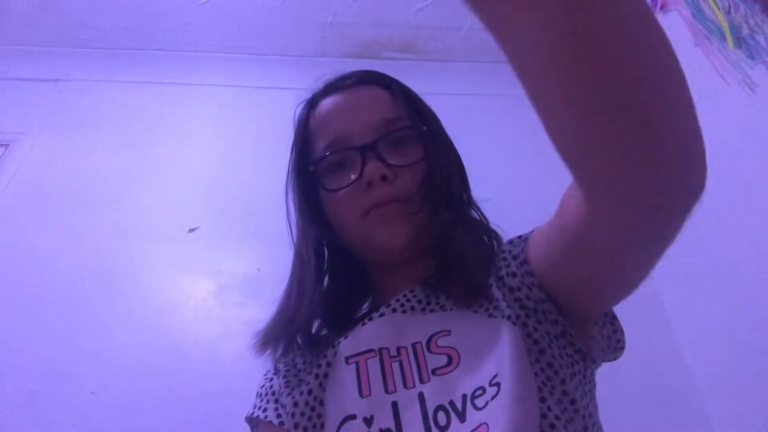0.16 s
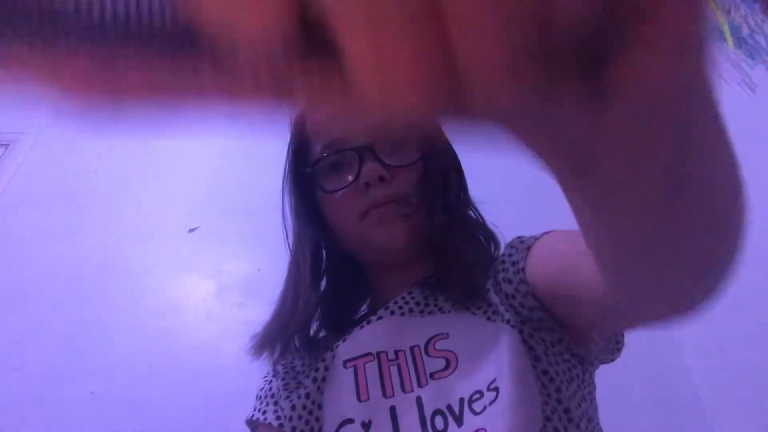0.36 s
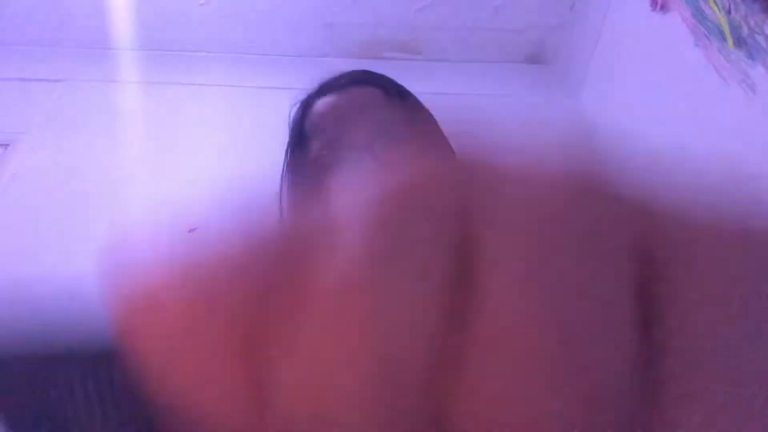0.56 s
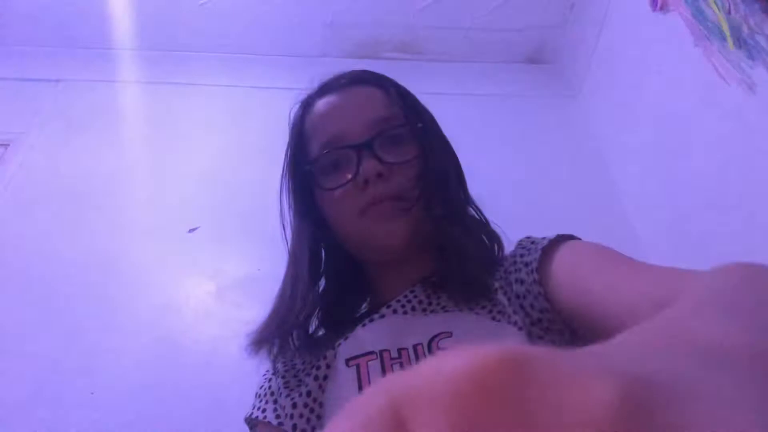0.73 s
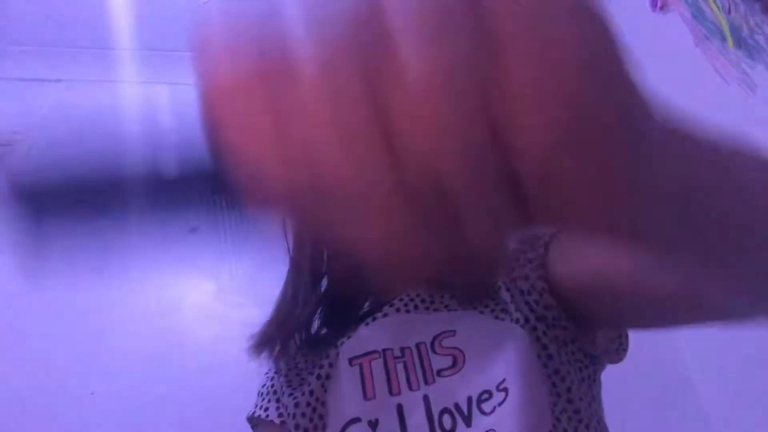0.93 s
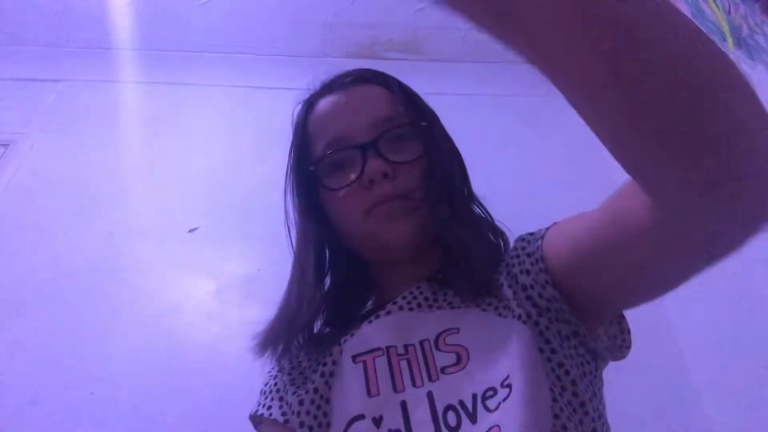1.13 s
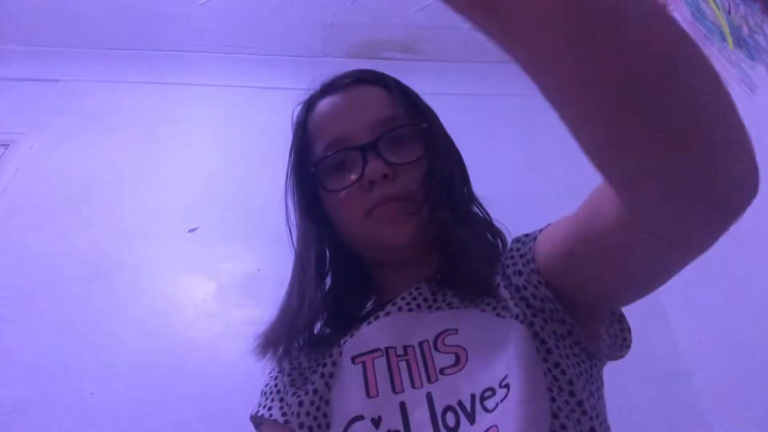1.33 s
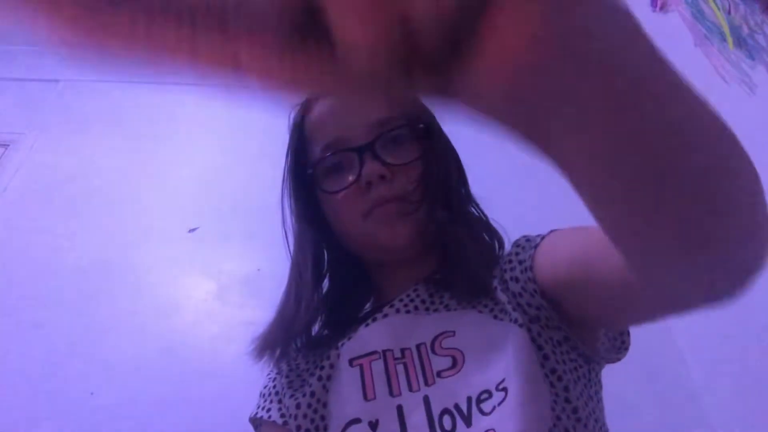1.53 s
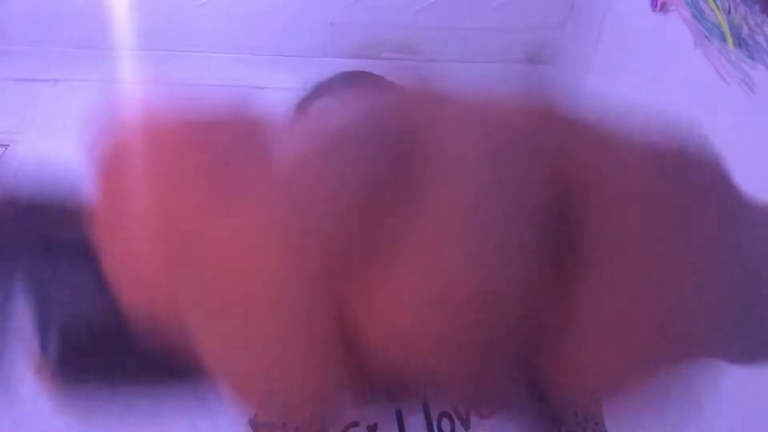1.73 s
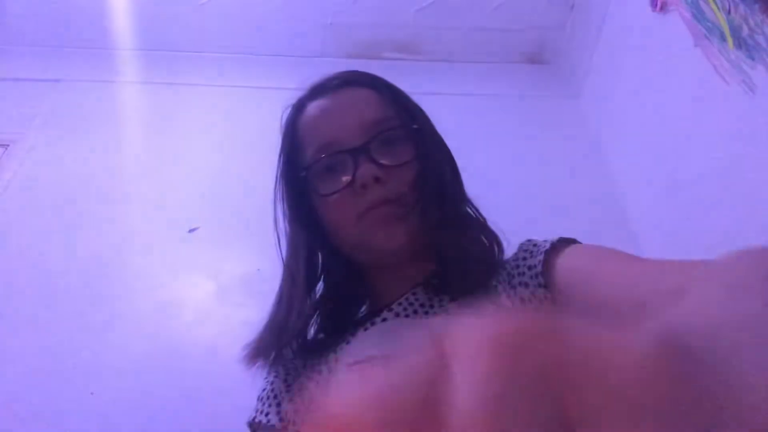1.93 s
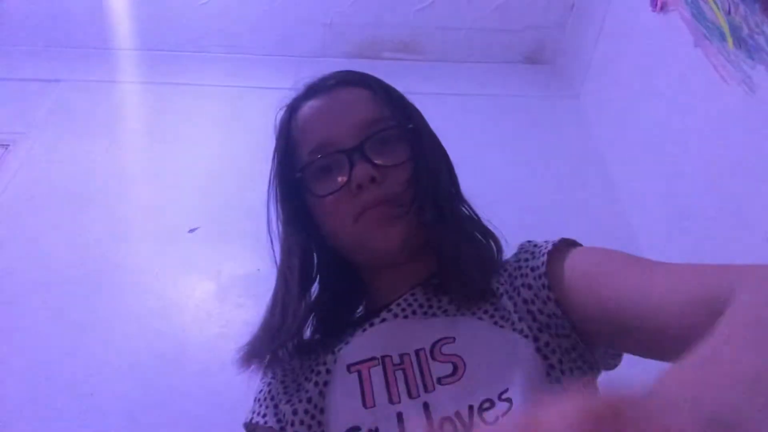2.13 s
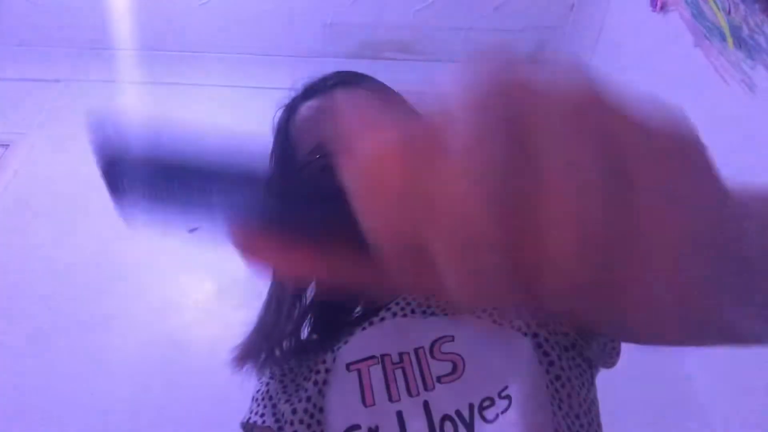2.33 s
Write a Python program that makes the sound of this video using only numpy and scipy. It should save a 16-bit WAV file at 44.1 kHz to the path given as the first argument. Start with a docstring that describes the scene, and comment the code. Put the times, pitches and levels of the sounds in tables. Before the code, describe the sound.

A plastic comb is scraped tooth by tooth very close to the microphone. Faint clicks begin at 0.2 s, become a loud, uneven ratcheting run from 0.37 to 0.7 s, and fade by 0.8 s. A second stroke starts weakly at 1.27 s, is strongest at 1.55-1.85 s, and ends near 2.0 s. Soft pressure thuds accompany both; a faint dull knock follows at 2.4 s over steady low hum.

```python
"""A plastic comb is dragged tooth by tooth over an edge right at a microphone, in two slow strokes.
Each tooth snaps free with a short chirped click; a faint hiss trails it and stops short.
Low thuds of the hand's pressure run under both strokes, and thin bright ticks join the second.
A dull knock comes after the strokes. A steady mains hum and room noise lie below throughout.
Clicks are shaped by resonances and a delay of the bass; the hiss and room are filtered noise."""
import sys
import numpy as np
from scipy import signal
from scipy.fft import rfft, irfft
from scipy.io import wavfile
from scipy.ndimage import uniform_filter1d

SR = 44100
rng = np.random.default_rng(int(sys.argv[2]) if len(sys.argv) > 2 else 0)


def wrap_up_sound(samples):
    """Save the sound to the file named by the first command line argument, as 16-bit audio."""
    columns = np.atleast_2d(samples).T
    # keep every value between -1 and 1, then stretch to whole-number steps
    tamed = np.clip(columns, -1, 1)
    steps = np.round(tamed * 32767).astype(np.int16)
    wavfile.write(sys.argv[1], SR, steps)


def voltage_ratio(decibels):
    """Convert decibels (scalar or array-like) to amplitude ratios, 20 dB per decade."""
    exponent = np.asarray(decibels, float) / 20
    return 10 ** exponent


N = 108618  # length of the scene in samples
SIZE = 4096  # samples in which one click and its hiss are built
HZ = np.fft.rfftfreq(SIZE, 1 / SR)  # the frequencies of a click's spectrum
LAG_S = 0.0005  # delay of a click at 1 kHz


def comb():
    """Each tooth of the comb snaps off the edge in turn and leaves a short hiss behind."""
    # The teeth. Each row: start in seconds, peak of the snap in dB, body in Hz, body boost in dB,
    # ring in Hz, dip beside the ring in Hz, rebound in Hz (1 / delay), rebound share from 0 to 1,
    # tilt in dB per octave.
    teeth = [(0.2094, -47.5, 700, -1, 2720, 2900, 7300, 0.23, -7),
             (0.2594, -29.5, 1600, 8.5, 3150, 3250, 6700, 0.46, -4),
             (0.2771, -28, 1520, 7.5, 3090, 3250, 7300, 0.49, -4.5),
             (0.3686, -20.5, 1300, 8, 2760, 2830, 4300, 0.25, -1.5),
             (0.3853, -19, 1300, 12, 3550, 3720, 5100, 0.22, 0.7),
             (0.4106, -19.5, 1260, 9.5, 3140, 2960, 5040, 0.48, -2),
             (0.4465, -20, 1270, 14, 2900, 2810, 5380, 0.44, -1.5),
             (0.472, -18, 1350, 10, 2890, 2770, 5560, 0.45, -1.1),
             (0.4925, -18.5, 1220, 9, 3030, 3190, 5800, 0.33, -1.2),
             (0.5639, -18.5, 1460, 0, 2800, 2600, 4520, 0.19, -1),
             (0.5862, -18, 1680, -18, 3000, 3110, 7400, 0.17, -1),
             (0.6073, -18, 1250, -1.5, 2960, 3180, 5270, 0.22, 0.9),
             (0.6465, -20, 1320, -7, 2600, 2420, 5180, 0.15, -3.5),
             (0.7078, -24, 790, 4, 2550, 2390, 5940, 0.24, -4.5),
             (0.7719, -40.5, 700, 7, 2650, 2870, 4300, 0.11, 7.3),
             (0.817, -48, 700, -8, 3230, 3270, 4300, 0.12, 4),
             (1.2661, -37.5, 1340, 11.5, 3050, 2900, 7100, 0.52, -3.5),
             (1.355, -31, 1280, 22.5, 3120, 2500, 6260, 0.54, 1),
             (1.3782, -33.5, 1260, 7, 2970, 2720, 6300, 0.57, -5),
             (1.5569, -22.5, 1170, 9.5, 2850, 2430, 7440, 0.19, -3),
             (1.575, -21, 1220, 7.5, 2760, 2390, 7300, 0.12, -2),
             (1.5943, -20, 1500, -11, 2750, 2420, 5760, 0.13, -5.5),
             (1.615, -19, 1130, 3, 2660, 2380, 5240, 0.25, -3),
             (1.6394, -18, 1260, 3, 2600, 2350, 4990, 0.1, -3.5),
             (1.6653, -18, 1200, 0, 2560, 2330, 5000, 0.13, -5),
             (1.6968, -23, 1000, 5.5, 2470, 2260, 6160, 0.22, -5.5),
             (1.7358, -22.5, 804, 9.5, 2460, 2345, 6100, 0.38, -3),
             (1.833, -25.5, 800, 4, 2400, 2210, 6000, 0.52, -7),
             (1.851, -26, 770, 8, 2400, 2234, 6360, 0.34, -6.5),
             (1.9924, -43.5, 700, 1, 2450, 2350, 6600, 0.41, -6.1)]
    out = np.zeros(N)
    draws = rng.standard_normal((len(teeth), SIZE + 6))
    for (s, *row), draw in zip(teeth, draws):
        noise, chance = draw[:SIZE], draw[SIZE:]
        add(out, s, trailed(tooth(*row, chance), noise))
    return out


def tooth(db, body_hz, body_db, ring_hz, dip_hz, rebound_hz, rebound, tilt_db, chance):
    """A snap through the comb's body mode and the tooth's ring, with an inverted rebound."""
    # Colour of the path into the microphone. Each row: frequency in Hz, gain in dB.
    path_colour = [(1500, 0.0), (2200, 0.46), (4000, 0.1), (6000, 0), (8000, 1.14), (9000, -9.5),
                   (10000, -15.5), (11000, -8.5), (13000, -9), (16300, -4.5)]
    cut_hz = 0.45 * body_hz  # the bass falls away below this
    cut = ((HZ / cut_hz) ** 2 / pole(cut_hz, np.sqrt(2) * cut_hz)) ** 2

    body_width_hz = 0.25 * body_hz
    body = pole(body_hz, body_width_hz * voltage_ratio(body_db)) / pole(body_hz, body_width_hz)

    ring_width_hz, dip_width_hz = 254, 296
    # the mirrored phase of the dip makes the ring swell after the snap
    ring = np.conj(pole(dip_hz, dip_width_hz)) / pole(ring_hz, ring_width_hz)

    echoes = 1 - np.clip(rebound, 0, 1) * np.exp(-2j * np.pi * HZ / rebound_hz)
    rattle_s, rattle_db = 0.0009, -19  # a few faint chance echoes inside the plastic
    for size, place in chance.reshape(-1, 2):
        delay_s = rattle_s * abs(np.tanh(place))
        echoes = echoes + voltage_ratio(rattle_db) * size * np.exp(-2j * np.pi * HZ * delay_s)

    colour = causal(tilt_db * np.log2(1 + HZ / 2000) + read(path_colour, HZ))
    thump = mode(177, 110, -11)  # the housing is pushed: Hz, width in Hz, relative dB
    return chirped(cut * body * ring * echoes * colour + thump, db, LAG_S)


def trailed(click, noise):
    """The click followed by nearly level hiss of its own blurred colour, which stops short."""
    # Extra colour of the hiss. Each row: frequency in Hz, gain in relative dB.
    trail_colour = [(100, -26), (300, 13), (700, -1), (1500, -10.5), (3000, -9.5), (4000, -6), (4800, -5),
                    (5800, -2), (7200, -10), (10000, 0), (12000, -8.5), (16000, -5)]
    start_s, rise_s, stop_s, stop_ramp_s = 0.0018, 0.00067, 0.057, 0.0017
    trail_db, fade_db, blur_hz = -10.5, -3.5, 700  # fade_db: level change by the stop
    t = np.arange(SIZE) / SR
    rise = np.clip((t - start_s) / rise_s, 0, 1)
    stop = np.clip((stop_s - t) / stop_ramp_s + 0.5, 0, 1)
    fade = voltage_ratio(fade_db * t / stop_s)

    power = abs(rfft(click, SIZE)) ** 2
    blurred = np.sqrt(abs(uniform_filter1d(power, round(blur_hz * SIZE / SR))))
    hiss = irfft(rfft(noise) * blurred * voltage_ratio(read(trail_colour, HZ)))
    # the click's energy is spread over the length of the trail
    out = voltage_ratio(trail_db) * hiss * rise * stop * fade / np.sqrt(stop_s * SR)
    add(out, 0, click)
    return out


def dull_knocks():
    """A wide low resonance with a faint brighter tick, its pressure turned upside down."""
    # The knocks. Each row: start in seconds, peak in dB.
    knocks = [(2.4168, -43.5)]
    knock = mode(370, 480, 0) ** 2  # Hz, width in Hz, relative dB
    tick = mode(1600, 1700, -24.5)
    return -struck(knocks, knock + tick, 0.00127)


def bright_ticks():
    """A very high, wide resonance gives a thin tick."""
    # The ticks. Each row: start in seconds, peak in dB.
    ticks = [(1.3553, -36), (1.9917, -46), (1.9937, -44.5), (2.002, -50)]
    return struck(ticks, mode(14200, 7500, 0) ** 2, LAG_S)


def pressure_thuds():
    """Low thuds of the hand's pressure on the housing, each a bass resonance."""
    # The thuds. Each row: start in seconds, peak in dB.
    thuds = [(0.384, -56.5), (0.414, -54), (0.472, -54), (.494, -50), (0.707, -60.5), (1.596, -50.5),
             (1.836, -56), (1.851, -50.5)]
    return struck(thuds, mode(166.6, 83, 0) ** 2, LAG_S)


def hum():
    """A steady mains tone, made from sine waves."""
    # The hum. Each row: frequency in Hz, rms level in dB.
    tones = [(99.9, -61.5)]
    t = np.arange(N) / SR
    return sum(np.sqrt(2) * voltage_ratio(db) * np.sin(2 * np.pi * hz * t) for hz, db in tones)


def room():
    """Low rumble and thin hiss: noise shaped in frequency, with faint drifting patches."""
    # Colour of the room noise. Each row: frequency in Hz, density in relative dB.
    room_colour = [(18, -39), (30, -41), (48, -30), (76, 1), (104, -19.5), (125, -6), (150, -12),
                   (306, -19.5), (378, -19), (608, -24.5), (1380, -32.5), (1530, -35), (7670, -39.5),
                   (8990, -43), (14500, -45), (16500, -67)]
    room_db, patchy_db = -66, 0.6  # both rms
    frame_count, hz = N // 512 + 5, np.fft.rfftfreq(2048, 1 / SR)
    real, imaginary, patches = rng.standard_normal((frame_count, 1025, 3)).T
    patches = uniform_filter1d(patches, size=16, axis=0)  # blurred over frequency
    patches = evened(uniform_filter1d(patches, size=6, axis=1))  # and over time
    spectrum = (real + 1j * imaginary) * voltage_ratio(read(room_colour, hz)[:, None] + patchy_db * patches)
    noise = signal.istft(spectrum, nperseg=2048, noverlap=1536)[1][:N]
    return voltage_ratio(room_db) * evened(noise)


def struck(events, response, lag_s):
    """Places one click per event; an event is a start in seconds and a peak in dB."""
    out = np.zeros(N)
    for s, db in events:
        add(out, s, chirped(response, db, lag_s))
    return out


def chirped(response, db, lag_1k_s):
    """Bending waves: the bass arrives behind the treble; the peak level is set to db."""
    lag_s = lag_1k_s * (np.maximum(HZ, 120) / 1000) ** -0.787  # grows towards the bass
    phase = -2 * np.pi * np.cumsum(lag_s) * SR / SIZE  # a delay is the slope of the phase
    click = irfft(response * np.exp(1j * phase))[:SIZE // 2]
    return voltage_ratio(db) * click / abs(click).max()


def pole(hz, width_hz):
    """Denominator of a resonance; as a numerator it makes a dip."""
    return (hz ** 2 - HZ ** 2 + 1j * HZ * width_hz) / hz ** 2


def mode(hz, width_hz, db):
    """Frequency response of one resonance, peak gain db."""
    return voltage_ratio(db) * 1j * HZ * width_hz / hz ** 2 / pole(hz, width_hz)


def causal(db):
    """Minimum-phase response for a dB curve: no sound comes ahead of its cause."""
    log_gain = db * np.log(10) / 20
    mirrored = np.r_[log_gain, log_gain[-2:0:-1]]
    return np.exp(np.conj(signal.hilbert(mirrored)))[:len(HZ)]


def read(points, hz):
    """Reads a curve of (Hz, dB) points on a log-frequency axis."""
    f, value = np.transpose(points)
    return np.interp(np.log(hz + 1), np.log(f + 1), value)


def evened(x):
    """Scales to rms 1."""
    return x / np.sqrt(np.mean(x ** 2) + 1e-20)


def add(mix, s, sound):
    """Mixes a sound in at time s in seconds."""
    part = mix[round(s * SR):][:len(sound)]
    part += sound[:len(part)]


def scene():
    """The comb with its knocks, ticks and thuds, over hum and room, as one channel."""
    handling = dull_knocks() + bright_ticks() + pressure_thuds()
    return (comb() + handling + hum() + room())[None]


def low_pass(x):
    """Removes everything above the highest recorded frequency."""
    return signal.sosfilt(signal.butter(12, 16980, fs=SR, output="sos"), x)


def record(dry):
    """A steep low-pass removes the sound above about 16 kHz."""
    edge = signal.firwin(511, 16120, window=("kaiser", 9), fs=SR)  # edge in Hz
    mix = signal.oaconvolve(dry, edge[None], "same")
    return low_pass(mix)


dry = scene()
out = record(dry)
wrap_up_sound(out)
```